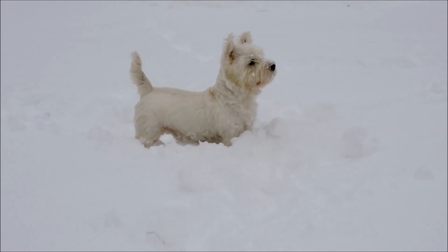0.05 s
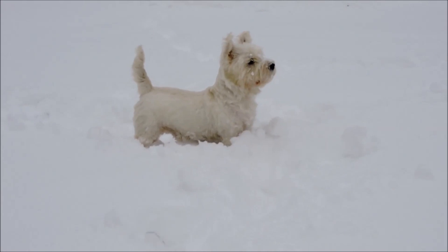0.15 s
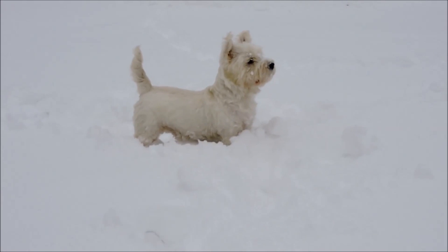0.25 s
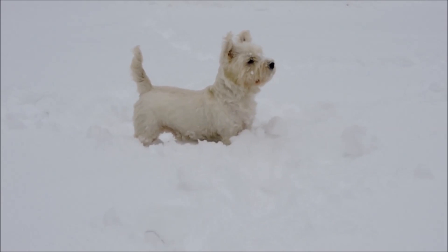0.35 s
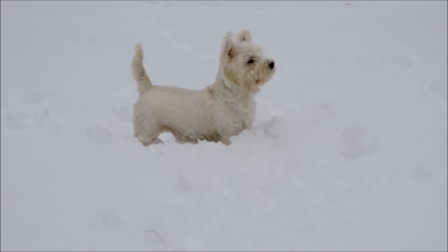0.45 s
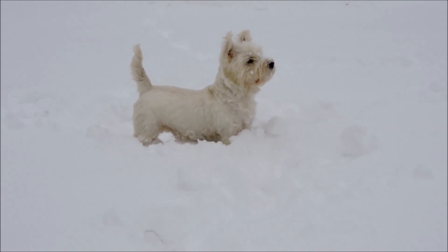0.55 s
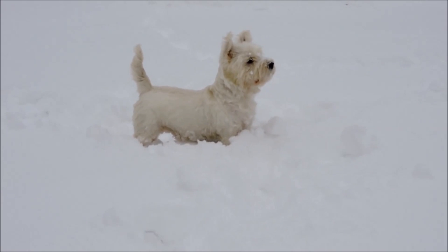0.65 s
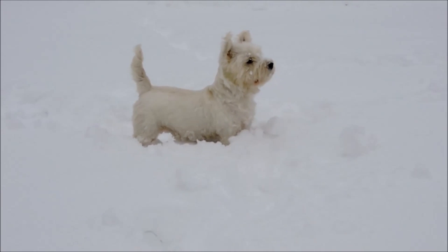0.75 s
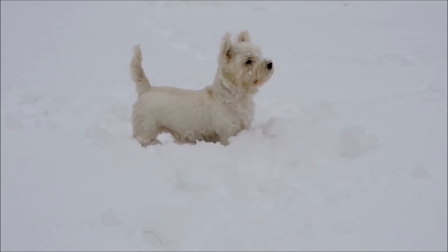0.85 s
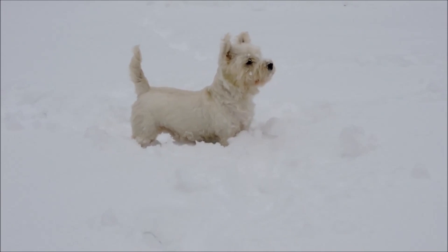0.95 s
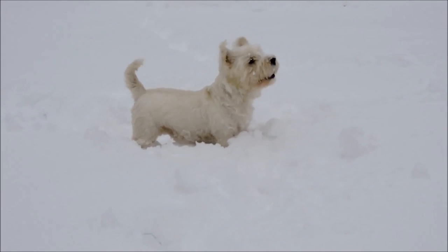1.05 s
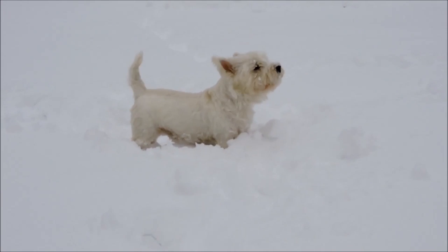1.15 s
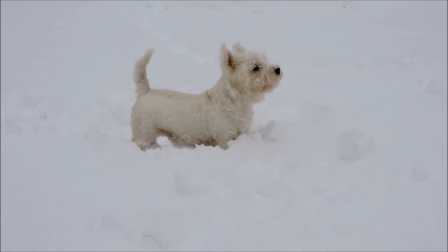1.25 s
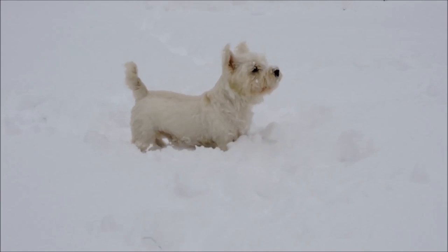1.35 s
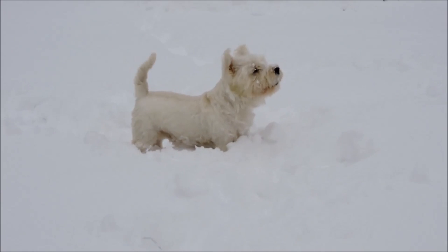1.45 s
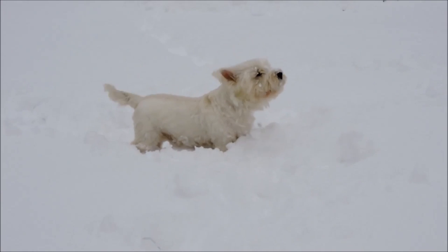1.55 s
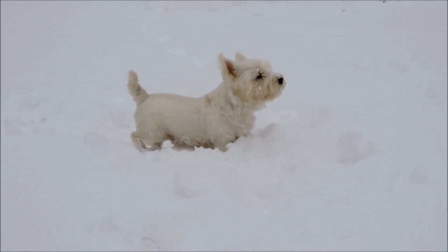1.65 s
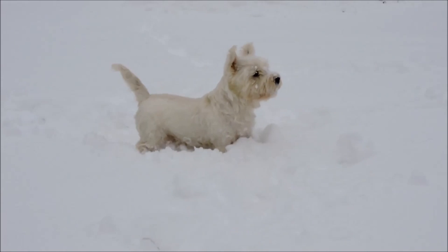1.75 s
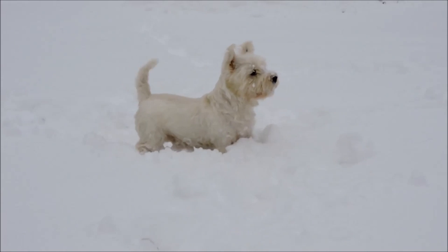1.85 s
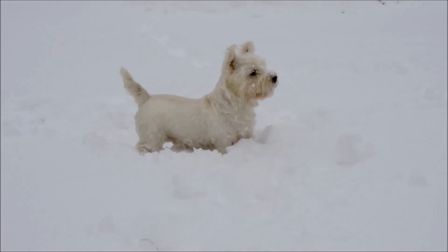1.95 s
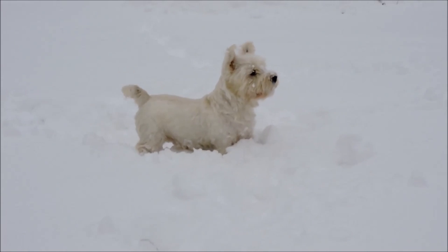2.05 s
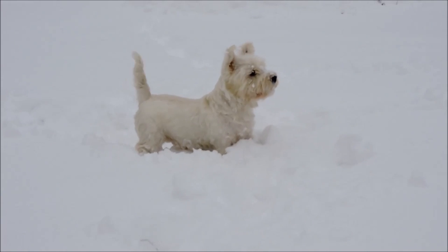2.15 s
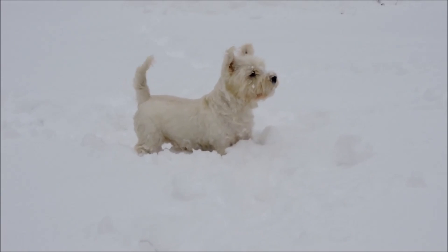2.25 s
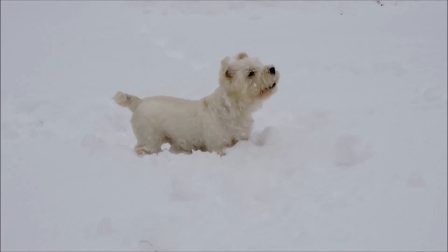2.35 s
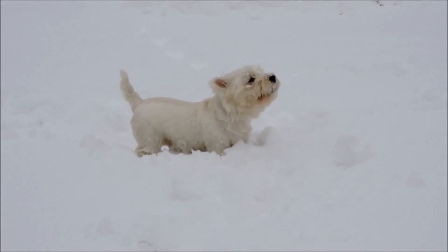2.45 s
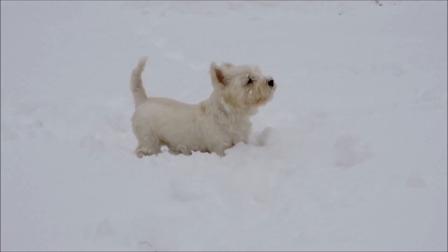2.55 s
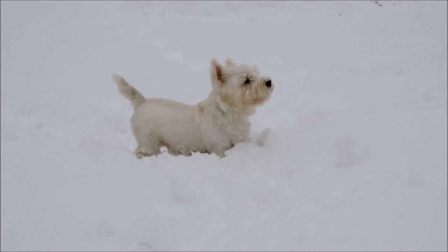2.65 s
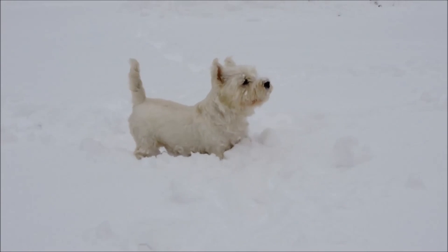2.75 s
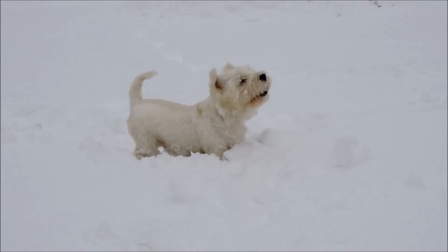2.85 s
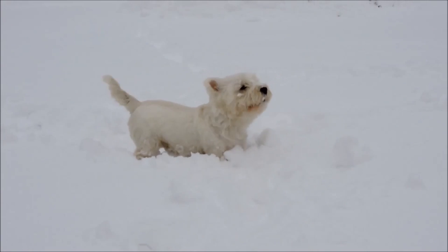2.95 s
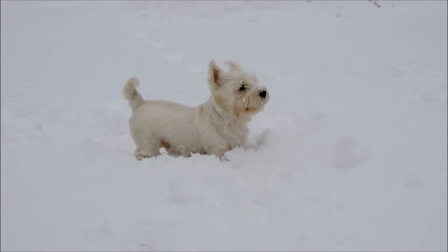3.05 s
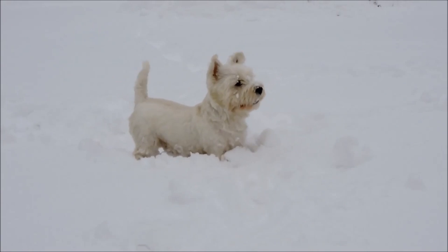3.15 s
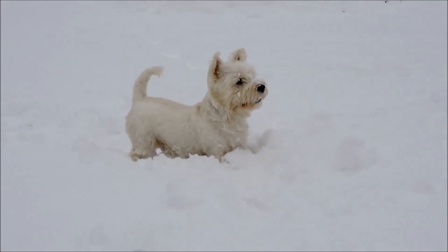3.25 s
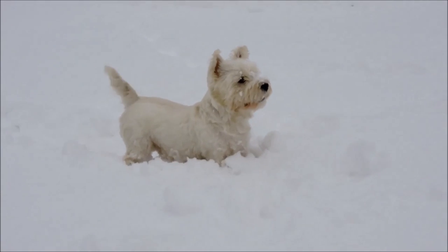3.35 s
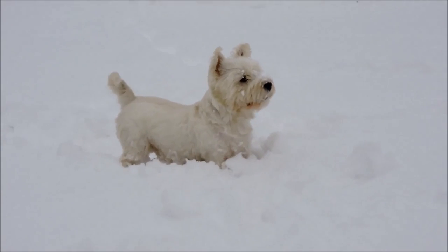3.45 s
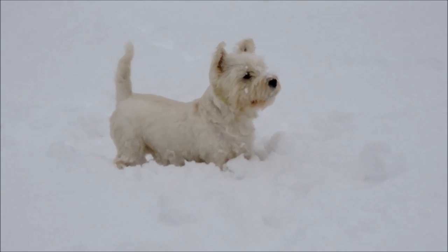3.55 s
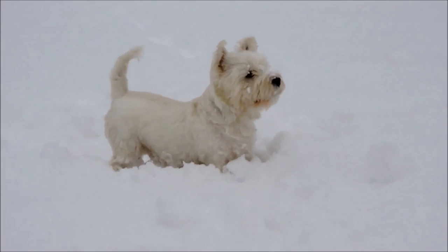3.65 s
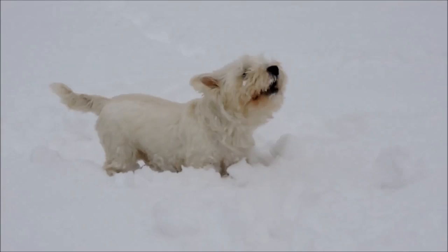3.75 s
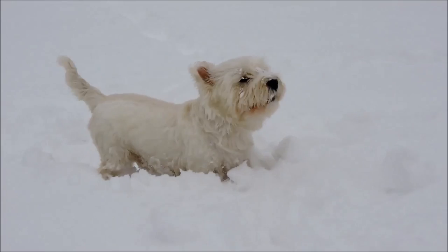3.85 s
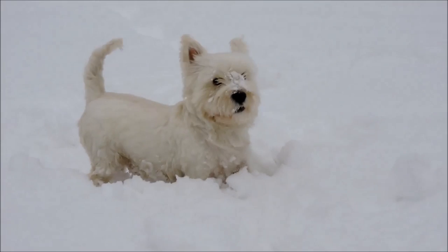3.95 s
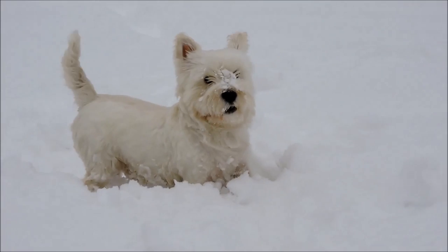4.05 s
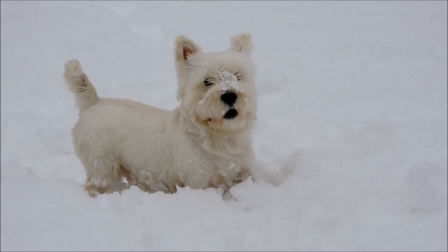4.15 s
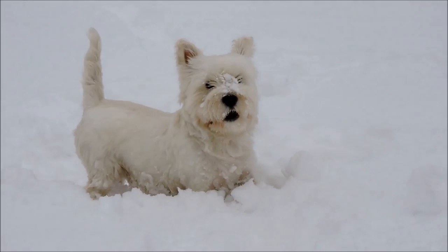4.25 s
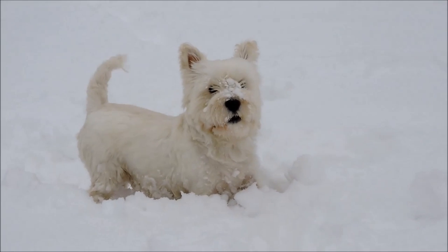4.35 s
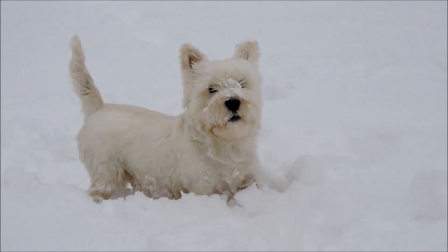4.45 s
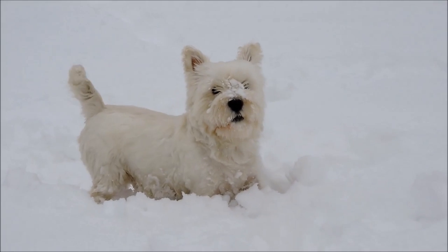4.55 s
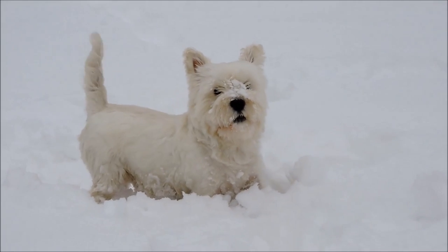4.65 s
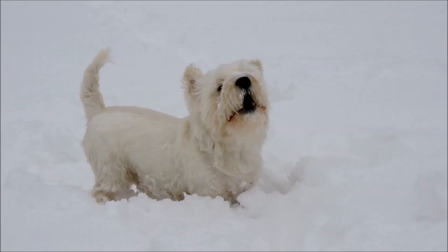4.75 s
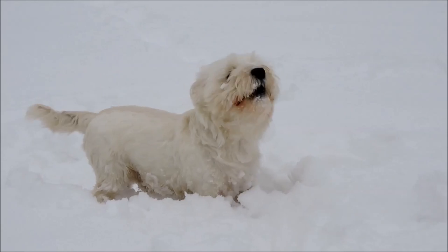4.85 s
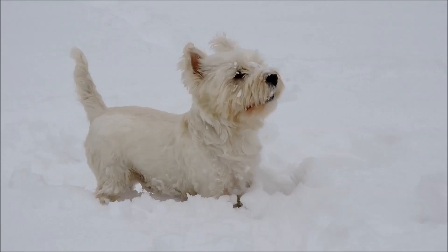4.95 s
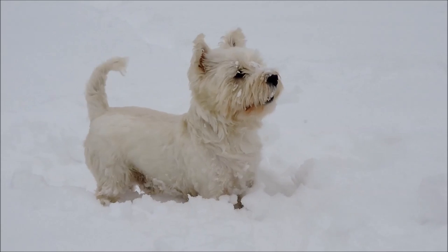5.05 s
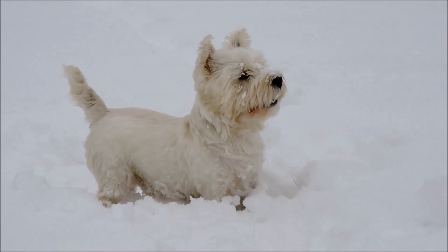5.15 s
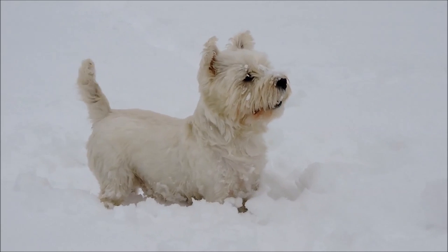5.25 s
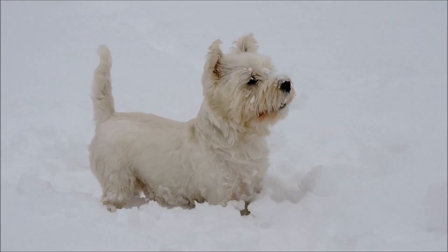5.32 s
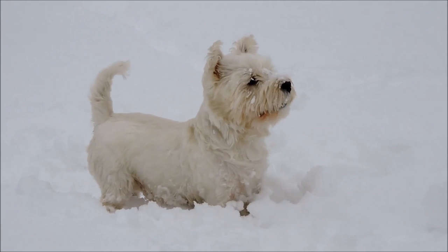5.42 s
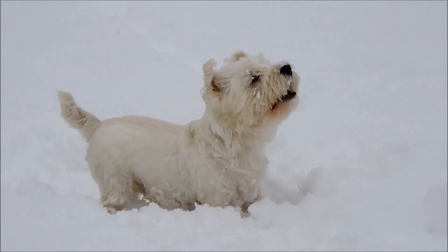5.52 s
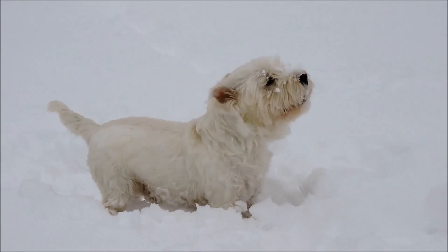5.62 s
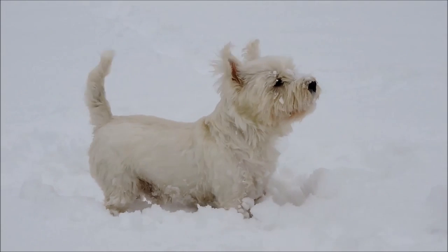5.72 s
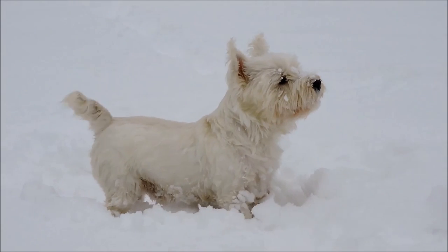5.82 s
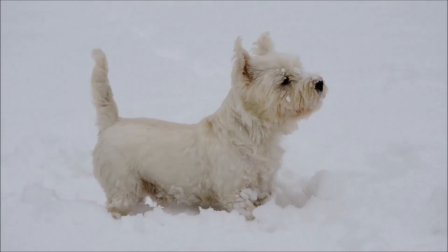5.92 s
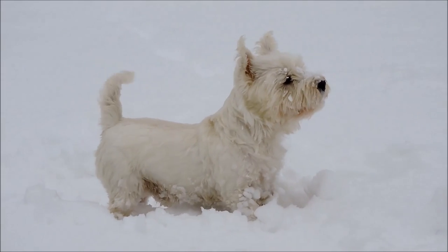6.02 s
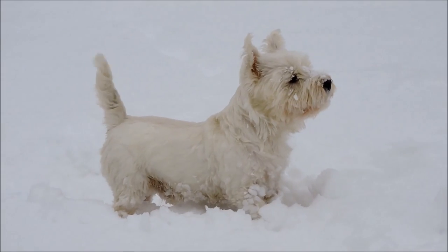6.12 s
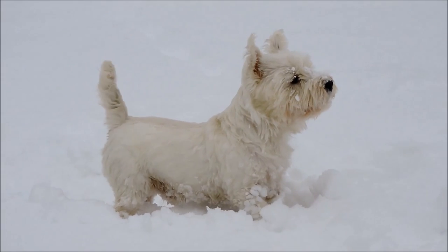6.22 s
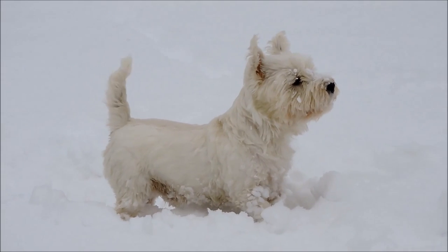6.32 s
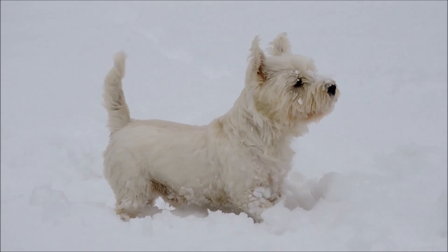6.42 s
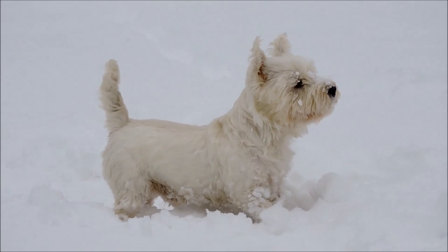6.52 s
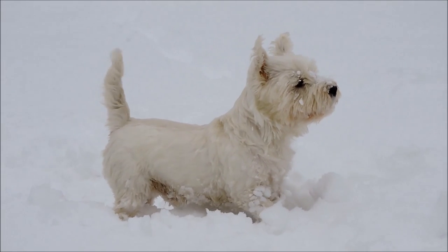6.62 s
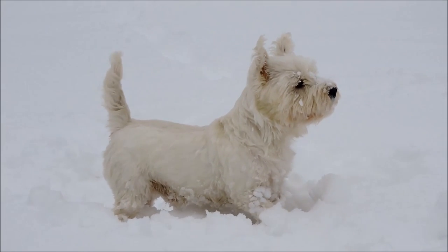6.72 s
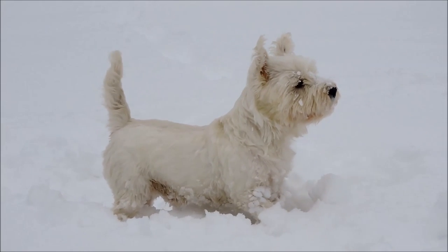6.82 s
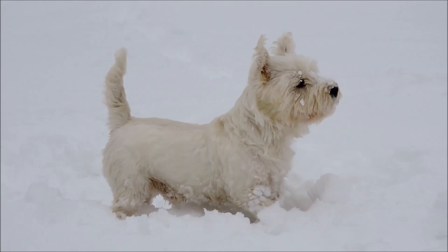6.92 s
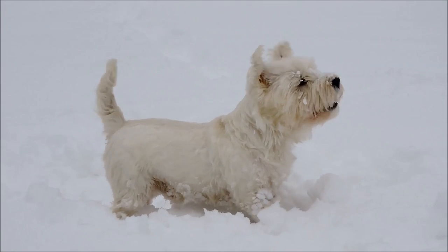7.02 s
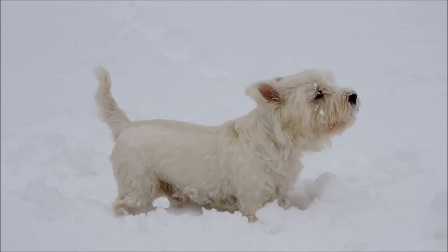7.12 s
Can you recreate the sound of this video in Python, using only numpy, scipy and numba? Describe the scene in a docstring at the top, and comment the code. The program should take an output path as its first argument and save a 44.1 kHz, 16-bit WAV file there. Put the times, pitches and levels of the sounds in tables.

```python
"""A small terrier in deep snow barks eight times: its vocal folds drive the throat and open mouth in an arch
of pitch that breaks into a rasp, while breath rings the muzzle and nose, hisses past the teeth and cracks.
The snow leaves only a faint, dull echo; soft sniffs and dry ticks, shaped from noise, dot the barking.
Random turbulence buffets the microphone, mostly on the right, over a faint outdoor hiss in four noise bands.
Gain control turns loud sound down at once and lets the level creep back."""
import sys
import numpy as np
from scipy import signal
from scipy.fft import rfft, irfft, next_fast_len
from scipy.io import wavfile
from scipy.ndimage import uniform_filter1d, minimum_filter1d, map_coordinates
from numba import njit

SR = 44100
rng = np.random.default_rng(int(sys.argv[2]) if len(sys.argv) > 2 else 0)


def generate_wav(sig):
    """Save sig (samples, or channels by samples) to the path in sys.argv[1] as 16-bit PCM at SR."""
    pcm = np.round(np.clip(np.atleast_2d(sig).T, -1, 1) * 32767).astype(np.int16)
    wavfile.write(sys.argv[1], SR, pcm)


N = 316638
TIME = np.arange(N) / SR

# steady wind on both ports, before each port's trim: time_s, level_db
BREEZE = [(0, -24.5), (1.0, -23), (1.5, -24.5), (1.92, -34), (2.25, -32.5), (2.8, -20.5), (3.12, -33),
          (3.6, -45.5), (4.2, -33), (4.55, -30.5), (5.05, -28.5), (5.65, -29.5), (5.9, -25.5),
          (6.25, -29.5), (6.75, -27), (7.18, -43)]
# gusts, mostly on the right port, before each port's trim:
# centre_s, half_length_s, level_db, extra_buffeting_db
GUSTS = [(0.158, 0.14, -17.5, -5), (0.699, .14, -17, 1.5), (1.048, 0.11, -16.5, 4),
         (1.44, 0.087, -18.5, -2.5), (1.763, 0.074, -23, -8), (2.11, 0.065, -16.5, -6.5),
         (2.33, 0.087, -15.5, -3), (2.787, 0.031, -17.5, -7), (3.321, 0.24, -28, 1),
         (3.958, 0.037, -28, -3), (4.437, 0.045, -23, -2), (4.73, 0.079, -22, 0.5),
         (5.275, 0.12, -27.5, -13), (6.005, 0.034, -31, -2.5), (6.59, 0.16, -27, -5.5),
         (6.911, 0.044, -21.5, -5), (7.08, 0.077, -19, -9)]
# single eddies that thump the right port: centre_s, level_db, half_length_s
THUMPS = [(1.057, -8, 0.0031), (3.354, -17, 0.0023), (4.021, -12.5, 0.0026), (4.418, -8.5, 0.0029),
          (5.226, -8, .005), (5.305, -7, 0.0052), (5.991, -9.5, 0.0064), (6.439, -11.5, 0.0031),
          (6.609, -9.5, 0.0031), (6.914, -8.5, 0.0041)]
# relative spectrum of the low wind rumble: frequency_hz, level_db
RUMBLE_SPECTRUM = [(15, -12.5), (30, 0.5), (62, 2.5), (100, -7), (160, -13.5), (250, -26), (400, -35.5),
                   (800, -64), (4000, -110)]
# relative spectrum of the faster puffs of wind: frequency_hz, level_db
BUFFET_SPECTRUM = [(40, -20.5), (100, 0), (220, -8.5), (320, -18), (450, -31), (800, -67), (3000, -110)]
# outdoor air, level of each band before its flicker: time_s, low_db, middle_db, high_db, hiss_db
AIR_LEVELS = [(0, -46, -47, -53.5, -48.5), (.4, -64, -43.5, -54, -51.5), (.85, -53.5, -46, -55, -55.5),
              (1.8, -50, -47, -55.5, -57.5), (2.3, -56.5, -46.5, -50.5, -55), (2.7, -38, -48.5, -55.5, -59),
              (3.15, -60.5, -55.5, -58.5, -65), (4.15, -54, -55, -59.5, -64.5),
              (4.6, -51.5, -52.5, -56, -63), (5.5, -57.5, -51.5, -57.5, -63), (5.8, -45.5, -52, -56, -60.5),
              (7.18, -47.5, -53.5, -58.5, -64)]
# relative spectra of those four bands, one list each: frequency_hz, level_db
AIR_BANDS = [
    [(200, 7), (400, 6.5), (850, -2.5), (1100, -6), (1600, -49)],
    [(650, -0.5), (1000, 1.5), (1600, -1), (2700, -5), (3300, -23.5), (4500, -47)],
    [(2200, -15), (3100, 5.5), (4500, 2.5), (6200, 1), (8000, -36)],
    [(5000, -12), (6700, 7), (8200, 5.5), (10000, 2), (13000, 1), (15800, -11)],
]
# stereo width of the outdoor air: frequency_hz, added_to_side_db
AIR_WIDTH = [(300, -19.5), (700, -6), (1200, 0), (2200, 5), (3300, 7), (4500, 1.5), (6200, -4.5), (9000, 0),
             (14000, 0)]

# the barks: burst_s, lead_in_s, fall_s, level_db, shut_power (how late and abruptly it ends),
# top_pitch_hz, last_pitch_hz, rasp (0-1, added to the base roughness), rasp_after_burst_s,
# jaw_factor and last_jaw_factor (scale the mouth resonances), mouth_db (before the mouth trim),
# muzzle_db and hiss_db (both ride on the bark's level), crack_db, crack_half_length_s
BARKS = [ (1.071, 0.027, .15, -1.5, 3.02, 699, 471, 0.43, .026, 1.142, 0.67, -1.5, -32, -29.5, -31, 0.018),
         (1.487, .035, 0.16, -3, 3.6, 642, 407, .1, 0.0198, 0.954, 0.89, -3.5, -29.5, -33.5, -47, 0.0072),
         (2.389, 0.032, .16, -2, 4.8, 720.4, 479, 0.69, 0.039, 0.96, 0.96, -3.5, -29, -32, -45, 0.0072),
         (2.877, .048, 0.16, -0.5, 2.75, 729, 472, 0.53, .05, 1.01, 0.95, -2.5, -30.5, -31.5, -26, 0.0083),
         (3.746, 0.053, 0.15, -9, 7.9, 715, 520, 0.8, 0.0555, 0.99, 1, -3.5, -25.5, -31, -49, 0.0057),
         (4.801, .048, 0.14, -.5, 7.5, 772.7, 521, 0.85, 0.0548, 1.116, 0.94, -3, -28, -27, -23, 0.0064),
         (5.557, 0.036, 0.16, 0.5, 3.9, 735, 544, 0.73, 0.0574, 1.103, 0.93, -3.5, -28.5, -31, -28.5, 0.022),
         (7.049, 0.033, 0.16, -2.5, 4.5, 666.4, 484, 0.46, 0.031, .97, 1.0, -3, -34.5, -32.5, -46, .008)]
# folds split in one bark and a second tone sounds: time_s, pitch_hz, level_db (before its trim)
SECOND_TONE = [(1.505, 820, -33), (1.517, 894, -3.5), (1.53, 1040, 12), (1.57, 1074, -1.5),
               (1.588, 1020, -31)]
# mouth resonances before the jaw moves them: frequency_hz, width_hz (of each of two passes), level_db
MOUTH_RESONANCES = [(1284, 357, 6), (1645, 200, 9.5)]
# relative spectrum of the voice through the throat: frequency_hz, level_db
THROAT_SPECTRUM = [(150, -30.5), (380, -16), (470, -7.5), (570, 1), (720, 3.5), (900, 3.5), (1080, -2.5),
                   (1300, -69), (2000, -29)]
# relative spectrum of breath ringing the muzzle: frequency_hz, level_db
MUZZLE_SPECTRUM = [(1500, -3), (2000, -5), (2400, 0), (2900, -4), (3250, -10), (3550, -6), (4300, -20),
                   (5100, -12), (5700, -21), (7000, -23.5)]
# relative spectrum of breath past the teeth: frequency_hz, level_db
TEETH_SPECTRUM = [(2500, -0.5), (4000, 0.5), (5200, 1), (6300, -3), (7500, -4.5), (7950, 3), (8600, 1.5),
                  (10400, -0.5), (11800, -7), (13500, -6.5), (15800, -20)]
# relative spectrum of breath through the nose: frequency_hz, level_db
NOSE_SPECTRUM = [(2200, -21), (2850, 2), (3080, 6), (3280, 6), (3480, -8), (3800, -24), (4500, -37)]
# relative spectrum of the short crack after the burst: frequency_hz, level_db
CRACK_SPECTRUM = [(1500, -7.5), (2200, -6), (2700, 8), (3300, 4), (3640, 18), (3950, -9), (5200, -23),
                  (9000, -20.5)]
# how far the bark leads on the left port: frequency_hz, phase_rad
PORT_PHASE = [(0, 0), (520, 0.28), (1640, -0.82), (3200, -.4), (6000, -0.36), (8100, -0.8), (11000, 0)]

# the dog draws air between barks: centre_s, length_s, resonance_hz, width_hz (of each pass), level_db
SNIFFS = [(3.295, 0.21, 1710, 703, -57.5), (3.944, 0.096, 1820, 548, -53), (4.994, 0.069, 1820, 900, -45.5),
          (6.648, 0.23, 2010, 2200, -51.5)]
# small ticks of snow and jaw: start_s, level_db, centre_hz, decay_s
TICKS = [(1.94, -42, 10300, 0.002), (4.273, -48, 2520, 0.0025), (5.5, -35.5, 1700, 0.004),
         (6.059, -43.5, 7100, .004)]

# effort climbs through the lead-in, sags as the lungs empty, drops as the folds shut
ONSET_DB, SAG_DB, SHUT_DB = 29, 10, 32
# step in level as the folds burst open, the time it takes, and how far the crack follows the burst
BURST_DB, BURST_S, CRACK_LAG_S = 9.5, 0.0046, 0.0098
# share of the top pitch at the start; lag of the top behind the burst; share lost over the fall at full rasp
START_PITCH, CREST_S, PITCH_SAG = .73, 0.01392, 0.2011
PITCH_WANDER, WANDER_HZ = 0.01765, 35.15  # share by which the pitch strays, and how fast
# roughness all through a bark; half length of the rasp; roughness added at the airy start of the lead-in
BASE_ROUGH, RASP_S, SIGH_ROUGH = .28, 0.03, 0.59
MOUTH_OPENS_DB, MOUTH_SHUTS_DB = 14, 4.5  # mouth resonance missing at the start and the end
# breath lost by the end, added at full rasp, and added before the burst
HISS_FADE_DB, RASP_HISS_DB, EARLY_BREATH_DB = 11.5, 2, 1
TOP_HZ = 15700


def undb(db):
    """Decibels to gain."""
    return 10 ** (np.asarray(db) / 20)


def curves(rows, t):
    """The columns of a table, joined by straight lines in time."""
    s, *columns = np.transpose(rows)
    return [np.interp(t, s, column) for column in columns]


def unit(x):
    """Scale to rms 1."""
    return x / np.sqrt(np.mean(x ** 2))


def steady(x, span_s=0.013):
    """Even the level out to 1 over a short span; faster flutter stays."""
    power = uniform_filter1d(x ** 2, max(int(span_s * SR), 1))
    return x / np.sqrt(np.abs(power) + 1e-12)


def colour(x, points):
    """Filter by a spectrum of (Hz, dB) points, straight lines over log frequency."""
    hz, db = np.transpose(points)
    size = next_fast_len(len(x) + 2048)
    f = np.maximum(np.arange(size // 2 + 1) * SR / size, 1)
    gain = undb(np.interp(np.log(f), np.log(hz), db))
    return irfft(rfft(x, size) * gain, size)[:len(x)]


def wobble(hz, count):
    """Smooth random drift up to about hz, spread about 1."""
    knots = rng.standard_normal(int(count * 2 * hz / SR) + 4)
    return map_coordinates(knots, [np.arange(count) * 2 * hz / SR], order=3, mode="mirror")


def noise(points):
    """Unit noise with a spectrum of (Hz, dB) points."""
    return unit(colour(rng.standard_normal(N), points))


@njit
def resonate(x, hz, width):
    """State-variable band-pass whose centre moves sample by sample."""
    y, band, low = np.empty(len(x)), 0., 0.
    for i in range(len(x)):
        g, k = np.tan(np.pi * hz[i] / SR), width / hz[i]
        v = (band + g * (x[i] - low)) / (1 + g * (g + k))
        band, low, y[i] = 2 * v - band, low + 2 * g * v, k * v
    return y


def resonate_twice(x, hz, width):
    """Two equal band-passes in a row, for steeper skirts."""
    return resonate(resonate(x, hz, 1. * width), hz, 1. * width)


def pan(x, db):
    """Two channels, the left louder by db."""
    return x * undb(np.array([[db], [-db]]) / 2)


def eddies(rate=150, scatter_db=3.0):
    """Separate puffs of turbulence, rate per second: many small, a few large."""
    count = int(rate * N / SR)
    chance = rng.random((count, 3))
    direction = np.sign(chance[:, 1] - .5)
    sizes = direction * undb(-scatter_db * np.log(1 - chance[:, 2]))
    puffs = np.bincount((chance[:, 0] * N).astype(int), sizes, N)
    return unit(colour(puffs, BUFFET_SPECTRUM))


def wind(rumble_db=0, buffet_db=(-15, -5), growth=0.64, gusty_db=2, breeze_db=(-2, -2), gust_db=(-19, -.5),
         flutter_db=1):
    """Unrelated turbulence on each port; stronger gusts add faster buffeting, and single eddies thump."""
    breeze, = curves(BREEZE, TIME)
    gusts, sharp_db = 0, 0
    for s, length, db, extra_db in GUSTS:
        swell = np.exp(-((TIME - s) / length) ** 2 / 2)
        gusts = gusts + undb(db) * swell
        sharp_db = sharp_db + extra_db * swell
    out = np.zeros((2, N))
    for port in range(2):  # left, right
        strength = np.hypot(undb(breeze + breeze_db[port]), gusts * undb(gust_db[port]))
        db = 20 * np.log10(strength)
        # buffeting gains on the rumble as the wind strengthens
        excess_db = buffet_db[port] + sharp_db + growth * (db + 30) + gusty_db * wobble(18, N)
        buffet = eddies() * undb(excess_db)
        level = undb(db + rumble_db + flutter_db * wobble(5.3, N))
        out[port] = level * steady(noise(RUMBLE_SPECTRUM) + buffet, span_s=.1)
    for s, thump_db, length in THUMPS:
        u = (TIME - s) / length
        out[1] += undb(thump_db) * (1 - 2 * u ** 2) * np.exp(-u ** 2)
    return out


def outdoors(flicker_db=1.28, common=0.2):
    """Distant hiss in four broad bands, only partly alike on the two sides and widest in the low treble."""
    out = np.zeros((2, N))
    for db, band in zip(curves(AIR_LEVELS, TIME), AIR_BANDS):
        sides = common * noise(band) + np.array([noise(band), noise(band)])
        out += undb(db + flicker_db * wobble(4.4, N)) * sides
    mid = out.mean(axis=0)
    side = colour((out[0] - out[1]) / 2, AIR_WIDTH)
    return np.array([mid + side, mid - side])


def gesture(t, event):
    """One push of the lungs: effort and pitch arch, the folds rasp at the height, the jaw opens and shuts."""
    s, rise, fall, peak_db, shut, top_hz, last_hz, rasp, rasp_s, jaw, last_jaw, mouth_db, *_ = event
    # progress: early runs 1 to 0 through the lead-in, late 0 to 1 through the fall
    early, late = np.clip((s - t) / rise, 0, 1), np.clip((t - s) / fall, 0, 1)
    held_back = np.clip((s - t) / BURST_S, 0, 1)
    db = peak_db - BURST_DB * held_back - ONSET_DB * early ** 1.31 - SAG_DB * late - SHUT_DB * late ** shut
    # a clear bark holds its pitch, a rasping one sags; both drop at the end
    climb = np.interp(t, [s - rise, s + CREST_S], [START_PITCH, 1])
    sag = PITCH_SAG * rasp
    hz = top_hz * (climb - sag * late) + (last_hz - top_hz * (1 - sag)) * late ** 3.2
    hz = hz * (1 + PITCH_WANDER * wobble(WANDER_HZ, len(t)))
    rasping = rasp * np.exp(-((t - s - rasp_s) / RASP_S) ** 2)
    rough = BASE_ROUGH + rasping + SIGH_ROUGH * early
    jaw_now = jaw + (last_jaw - jaw) * late ** 1.45
    opening_db = mouth_db - MOUTH_OPENS_DB * early - MOUTH_SHUTS_DB * late ** 4
    breath_db = RASP_HISS_DB * rasping - HISS_FADE_DB * late ** 2.84 + EARLY_BREATH_DB * held_back
    return db, hz, rough, jaw_now, opening_db, breath_db


def folds(t, hz, rough, jitter=0.1187, shimmer=1.0, rasp=1.0, half=0.75, slope=2.24, rasp_floor=0.31,
          second_db=-3, flutter=1.0, flutter_hz=125, break_db=4):
    """Glottal flow and its gate: uneven cycles, strong-weak alternation, flutter and air chopped once a cycle."""
    n = len(t)
    phase = 2 * np.pi * np.cumsum(hz * (1 + jitter * rough * wobble(220.7, n))) / SR
    # the higher the harmonic, the more it varies from cycle to cycle
    tone = unit(sum(np.sin(k * phase + 0.79 * (k - 1) * wobble(162.1, n)) / k ** slope
                    for k in np.arange(1, 6)))
    # loose tissue flaps slower than the pitch and puts sidebands round every harmonic
    flap = np.cos(2 * np.pi * np.cumsum(flutter_hz * (1 + 0.319 * wobble(49.93, n))) / SR)
    alternation = half * wobble(60.24, n) * np.cos(phase / 2)
    tone = tone * (1 + rough * (shimmer * wobble(330, n) + alternation + flutter * flap))
    split_hz, split_db = curves(SECOND_TONE, t)
    split = (t > SECOND_TONE[0][0]) & (t < SECOND_TONE[-1][0])
    second = split * undb(split_db + second_db) * np.sin(2 * np.pi * np.cumsum(split_hz) / SR)
    # the first tone modulates the second, which gives sum and difference tones
    second = second * (1 + 0.49 * np.sin(phase) + .3 * wobble(200, n))
    gate = (1 + .7 * np.cos(phase)) * undb(2.5 * wobble(90, n))
    chopped = rng.standard_normal(n) * gate
    air = unit(colour(chopped, [(400, -4.5), (1200, 0.5), (3000, -16.0), (8000, -52.5)]))
    # as the rasp grows the tone gives way to the chopped air
    flow = undb(-break_db * rough ** 2) * tone + second + (rasp_floor + rasp * rough) * air
    return flow, gate


def breath(gate, points, spread, ripple_db):
    """Pulsed air through narrow gaps, its fine resonances new for each bark; partly unlike on the two sides."""
    hz = np.linspace(1500, 16000, 70)
    ripple = np.transpose([hz, ripple_db * rng.standard_normal(len(hz))])
    mid, left, right = (unit(colour(colour(rng.standard_normal(len(gate)) * gate, ripple), points))
                        for _ in range(3))
    return mid + spread * np.array([left, right])


def bark(t, event, nose_db=-29, nose_follows=1.0, muzzle_fades=2.6, throat_pan_db=4.0, mouth_pan_db=2.5):
    """The folds drive throat and open mouth; breath rings muzzle and nose and hisses past the teeth."""
    db, hz, rough, jaw, mouth_db, breath_db = gesture(t, event)
    burst_s, *_, muzzle_db, hiss_db, crack_db, crack_s = event
    flow, gate = folds(t, hz, np.clip(rough, 0, 1))
    throat = steady(colour(flow, THROAT_SPECTRUM))
    mouth = steady(sum(undb(d) * resonate_twice(flow, f * jaw, w) for f, w, d in MOUTH_RESONANCES))
    share = np.clip(undb(mouth_db - 2.22), 0, .9)  # mouth trim, in dB
    voice = pan(np.sqrt(1 - share ** 2) * throat, throat_pan_db) + pan(share * mouth, mouth_pan_db)
    muzzle_gain = undb(muzzle_db + muzzle_fades * breath_db)
    muzzle = muzzle_gain * breath(gate, MUZZLE_SPECTRUM, spread=0.94, ripple_db=2.5)
    hiss = undb(breath_db + hiss_db) * breath(gate, TEETH_SPECTRUM, spread=0.57, ripple_db=2.0)
    # the nose takes a growing share of the air over the first tenth of a second of each bark
    nose_ramp = np.clip((t - t[0]) / 0.098, 0, 1) ** 2
    nose_gain = undb(nose_db + nose_follows * db) * nose_ramp
    nose = nose_gain * breath(gate, NOSE_SPECTRUM, spread=0.35, ripple_db=4.5)
    burst = undb(crack_db) * np.exp(-((t - burst_s - CRACK_LAG_S) / crack_s) ** 2)
    crack = burst * breath(gate, CRACK_SPECTRUM, spread=0.585, ripple_db=3.0)
    fade = np.clip(np.minimum(t - t[0], t[-1] - t) / 0.0018, 0, 1)
    driven = (voice + pan(muzzle, db=0.0) + pan(hiss, db=-1.5)) * undb(db)
    return (driven + nose + crack) * fade


def dog():
    """All the barks, each pushed out on its own stretch of time."""
    out = np.zeros((2, N))
    for event in BARKS:
        s, rise, fall = event[:3]
        span = (TIME > s - rise - .004) & (TIME < s + fall + .004)
        out[:, span] += bark(TIME[span], event)
    return out


def ports(x):
    """The bark reaches the two microphone ports slightly out of step: a phase lead that varies with pitch."""
    size = next_fast_len(N)
    lead, = curves(PORT_PHASE, np.arange(size // 2 + 1) * SR / size)
    return irfft(rfft(x, size) * np.exp(.5j * np.array([lead, -lead])), size)[:, :N]


def garden(x, t60=0.41, wet_db=-33):
    """Faint, dull echo from things beyond the snow: decaying noise tails, one a side."""
    t = TIME[:SR]
    tails = rng.standard_normal((2, SR)) * undb(-60 * t / t60) * np.minimum(t / 0.017, 1)
    tails /= np.sqrt(np.sum(tails ** 2, axis=1, keepdims=True))
    dull = colour(x.mean(axis=0), [(700, 3.0), (2000, 2), (8000, -14)])
    return undb(wet_db) * np.array([signal.fftconvolve(dull, tail)[:N] for tail in tails])


def small_sounds(glide=.2):
    """Soft sniffs, air through a resonance that rises in pitch, and a few dry ticks of decaying noise."""
    out, air = np.zeros(N), rng.standard_normal(N)
    for s, length, hz, width, db in SNIFFS:
        u = np.clip((TIME - s) / length, -2, 2)
        centre = hz * np.exp(glide * u)
        out += undb(db) * np.exp(-(2 * u) ** 2) * unit(resonate_twice(air, centre, width))
    for s, db, hz, decay in TICKS:
        ring = (TIME >= s) * np.exp(-np.abs(TIME - s) / decay)
        centre = np.full(N, 1. * hz)
        out += undb(db) * ring * unit(resonate_twice(air, centre, 1.4 * hz))
    return out


def gain_control(x, threshold_db=-11.0, slope=0.41, recover_db_per_s=12, span_s=.012):
    """Loud sound turns both channels down at once; the gain then creeps back."""
    power = uniform_filter1d(np.mean(x ** 2, axis=0), max(int(span_s * SR), 1))
    over_db = np.maximum(10 * np.log10(np.abs(power) + 1e-12) - threshold_db, 0)
    recovery_db = recover_db_per_s * TIME
    # the running maximum holds the deepest cut while the recovery line climbs
    return x * undb(recovery_db - np.maximum.accumulate(slope * over_db + recovery_db))


def scene():
    """The dog and its faint echo, in wind and open air."""
    barks = dog()
    return ports(barks) + garden(barks) + small_sounds() + wind() + outdoors()


def record(dry, ceiling=1.0, hold_s=0.00098):
    """Gain control ducks loud sound, a fast limiter holds peaks at the ceiling, a steep low-pass cuts the top."""
    ducked = gain_control(dry)
    headroom = np.minimum(ceiling / (np.abs(ducked) + 1e-9), 1)
    size = max(int(hold_s * SR), 1)
    gain = uniform_filter1d(minimum_filter1d(headroom, size, axis=1), size, axis=1)
    low_pass = signal.ellip(8, .2, 70, TOP_HZ, fs=SR, output="sos")
    return signal.sosfilt(low_pass, ducked * gain)


dry = scene()
out = record(dry)
generate_wav(out)
```